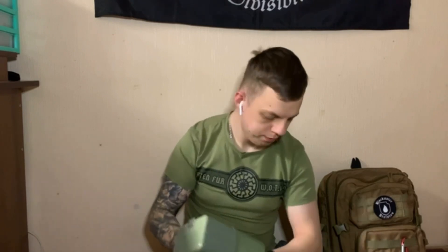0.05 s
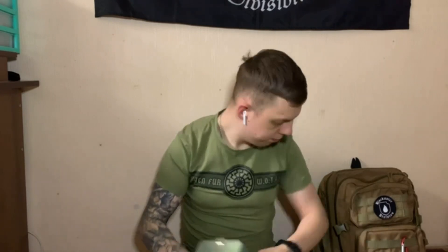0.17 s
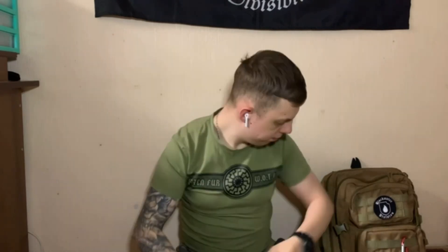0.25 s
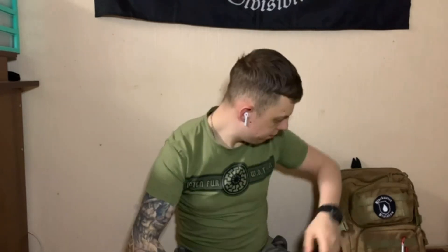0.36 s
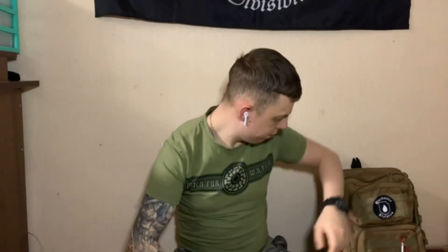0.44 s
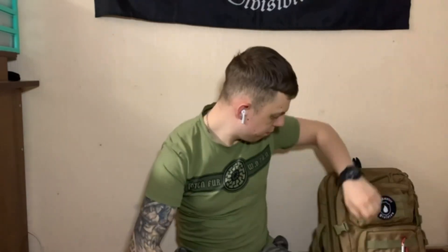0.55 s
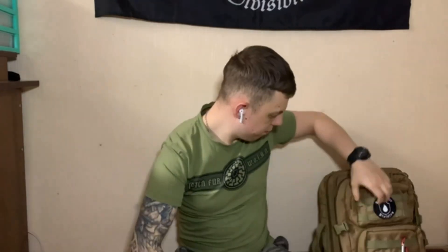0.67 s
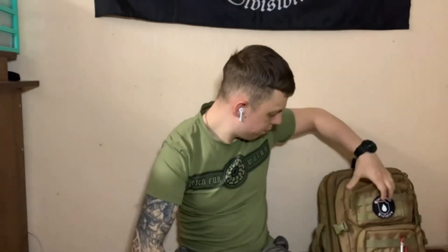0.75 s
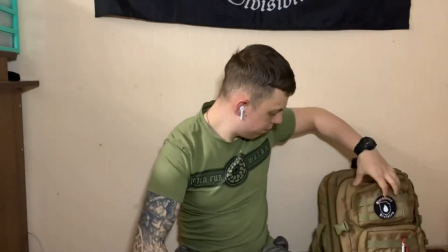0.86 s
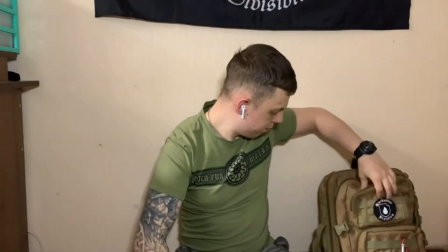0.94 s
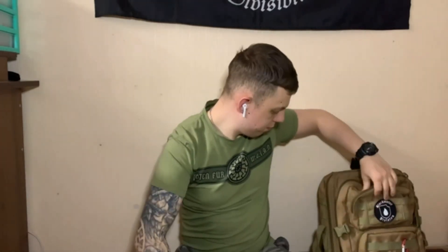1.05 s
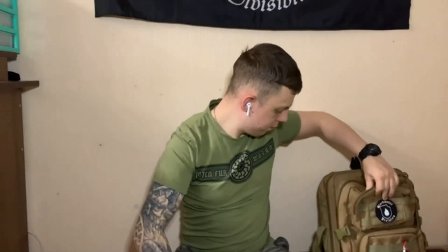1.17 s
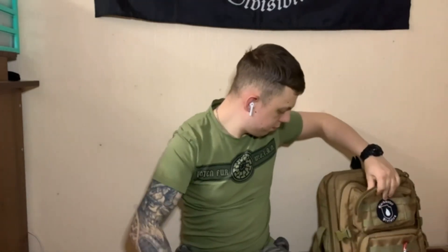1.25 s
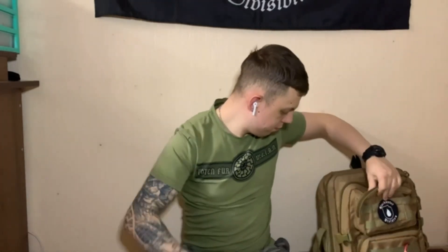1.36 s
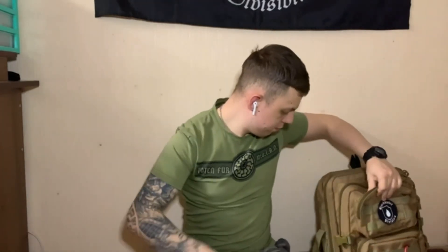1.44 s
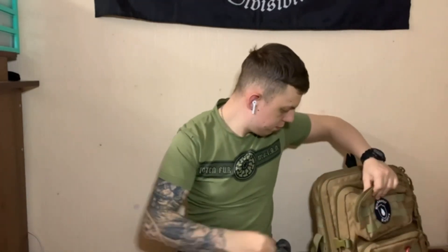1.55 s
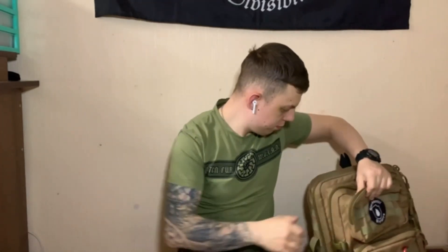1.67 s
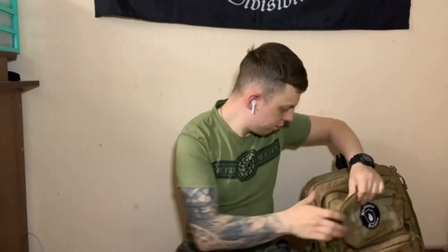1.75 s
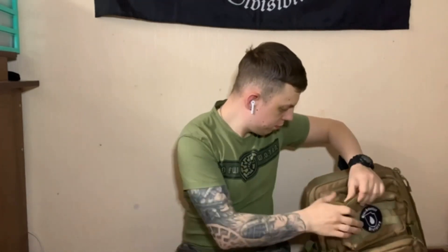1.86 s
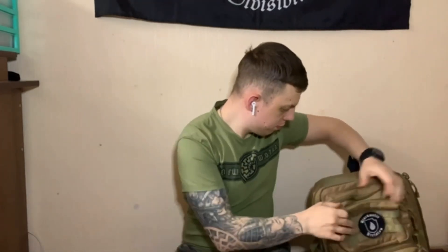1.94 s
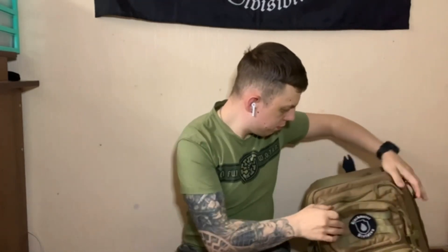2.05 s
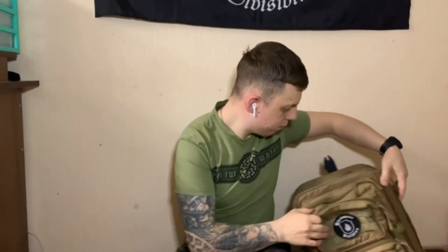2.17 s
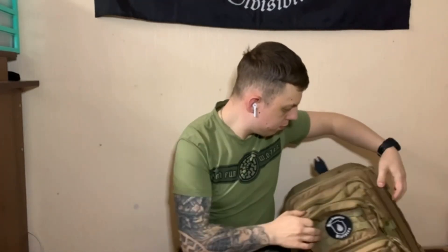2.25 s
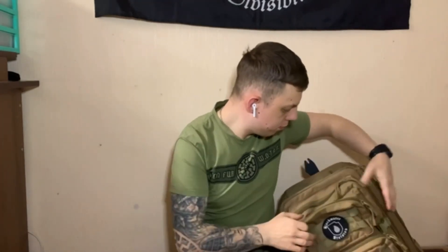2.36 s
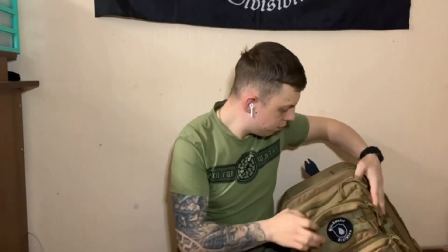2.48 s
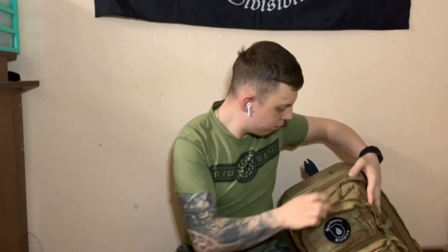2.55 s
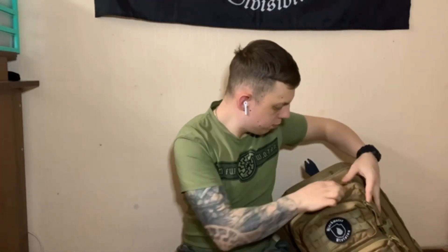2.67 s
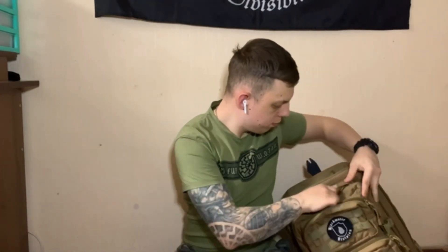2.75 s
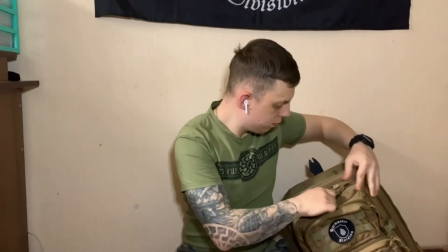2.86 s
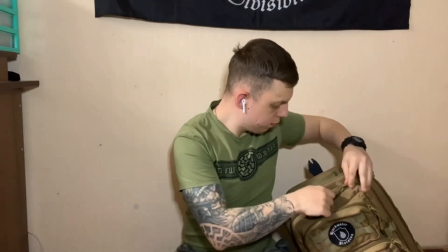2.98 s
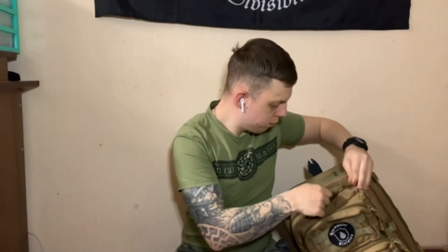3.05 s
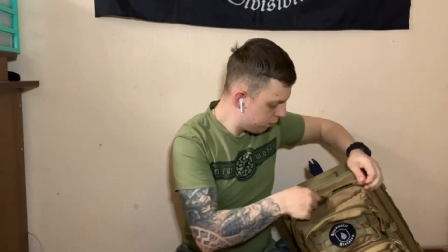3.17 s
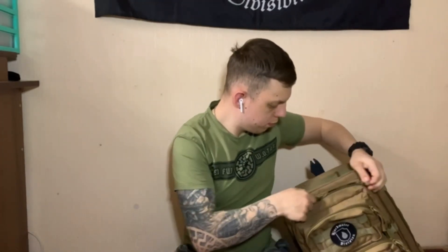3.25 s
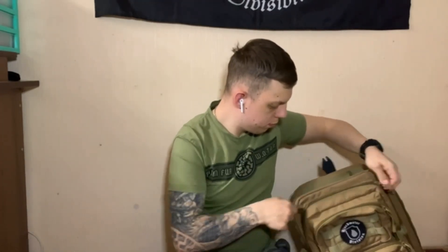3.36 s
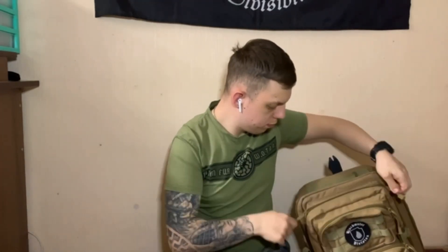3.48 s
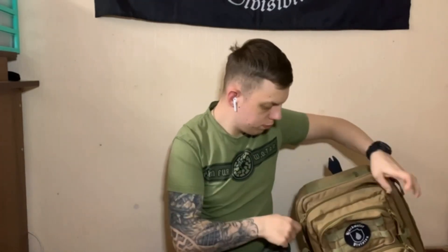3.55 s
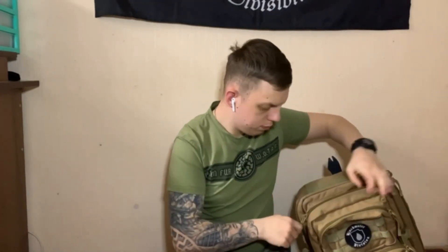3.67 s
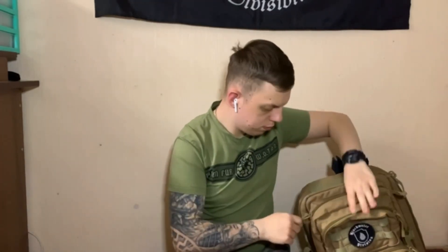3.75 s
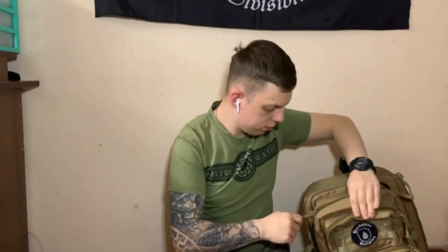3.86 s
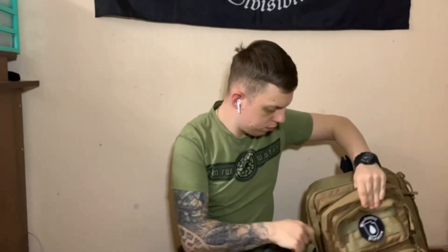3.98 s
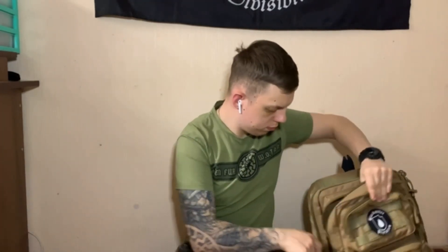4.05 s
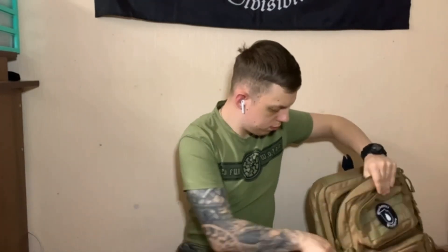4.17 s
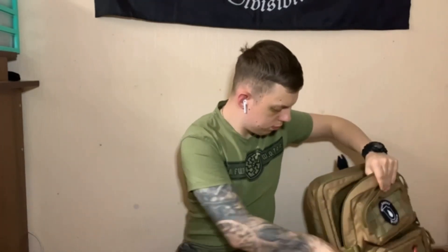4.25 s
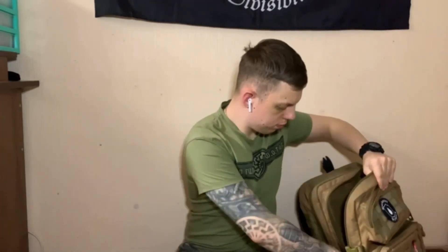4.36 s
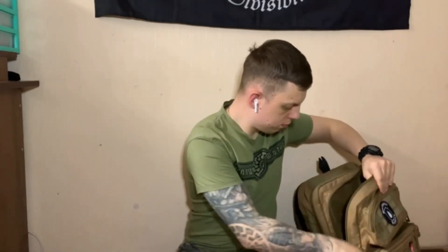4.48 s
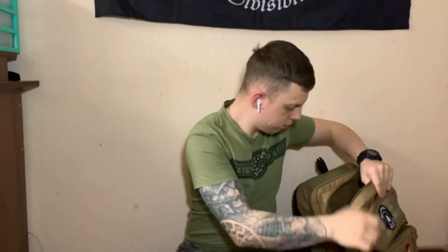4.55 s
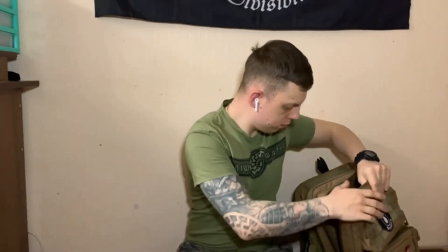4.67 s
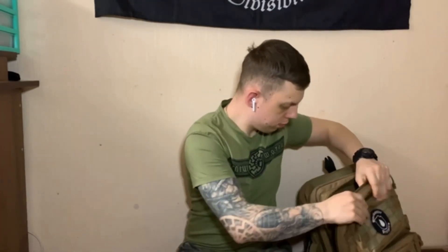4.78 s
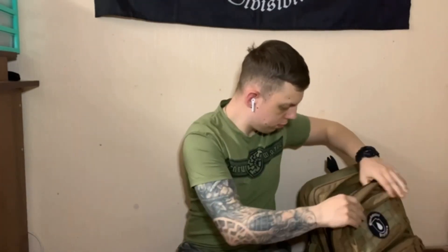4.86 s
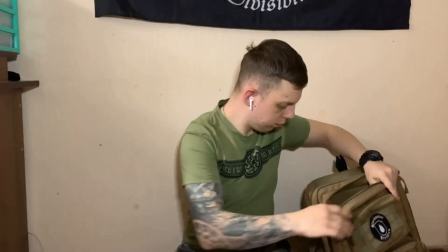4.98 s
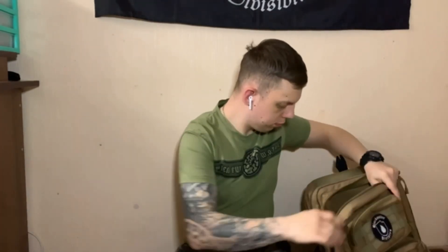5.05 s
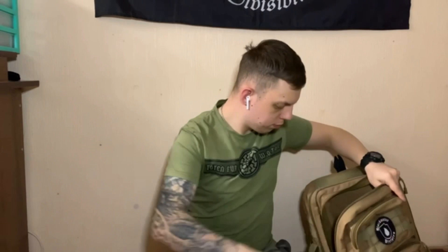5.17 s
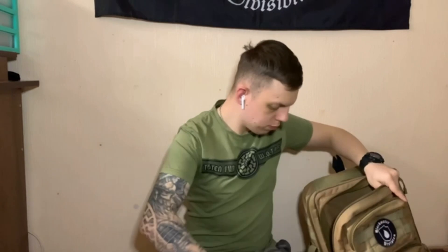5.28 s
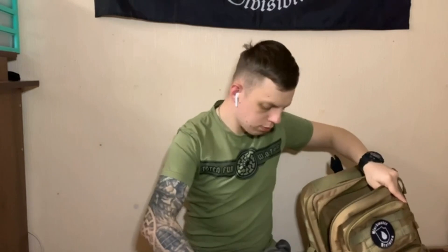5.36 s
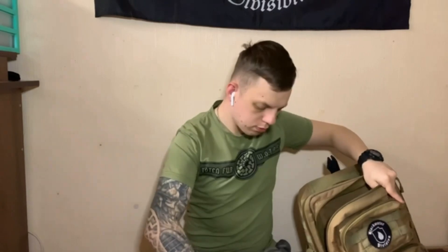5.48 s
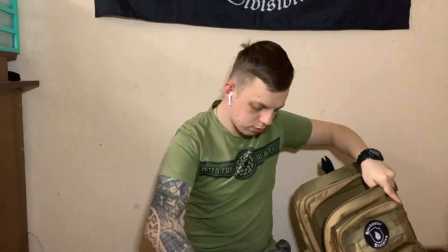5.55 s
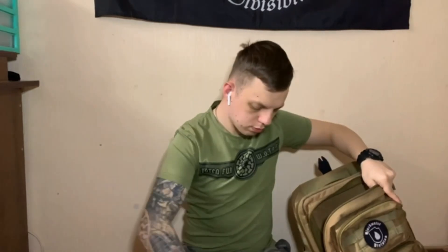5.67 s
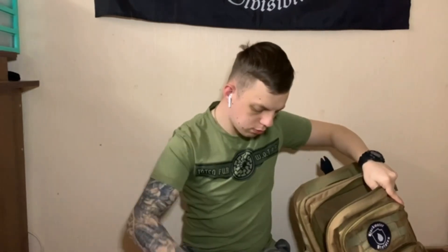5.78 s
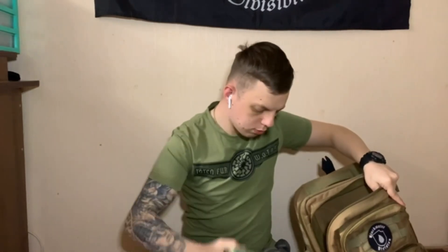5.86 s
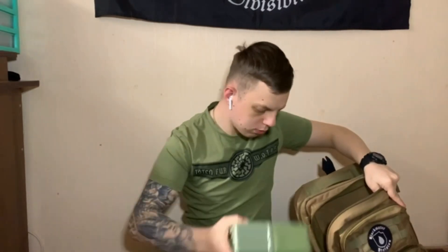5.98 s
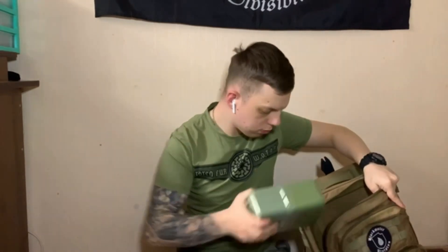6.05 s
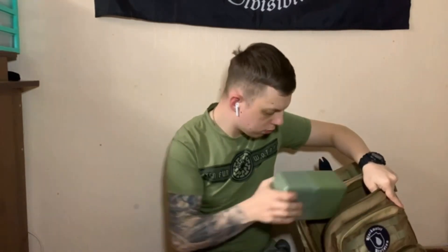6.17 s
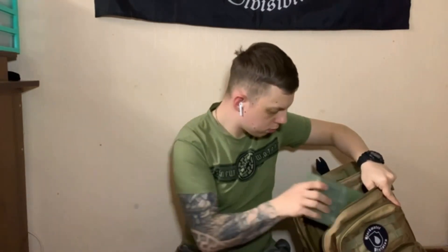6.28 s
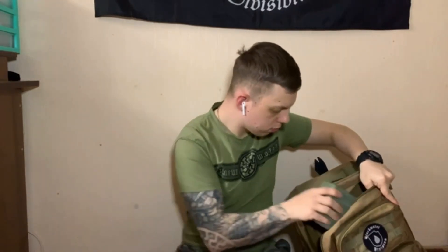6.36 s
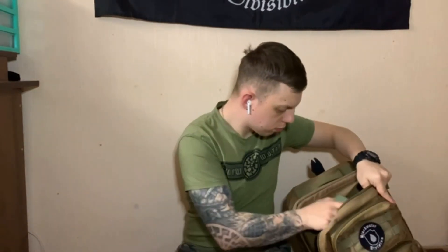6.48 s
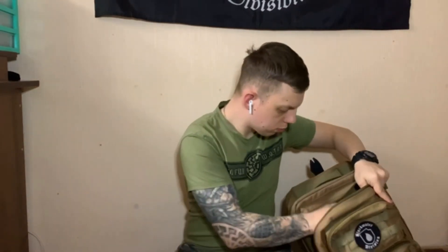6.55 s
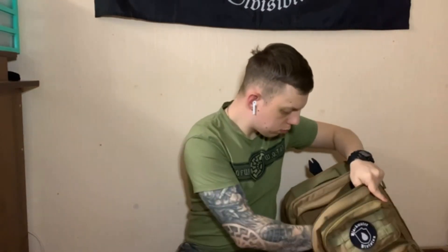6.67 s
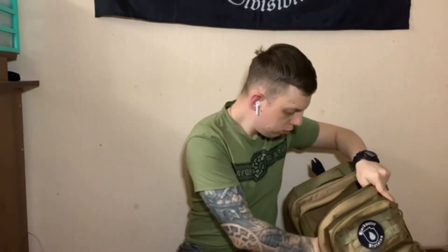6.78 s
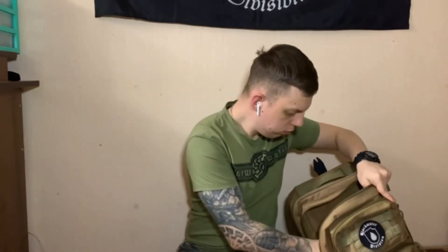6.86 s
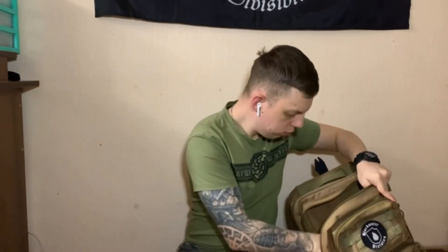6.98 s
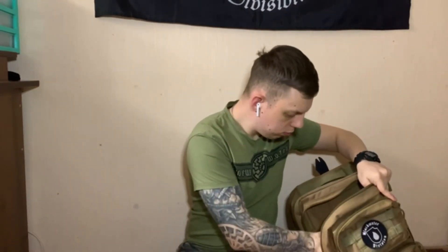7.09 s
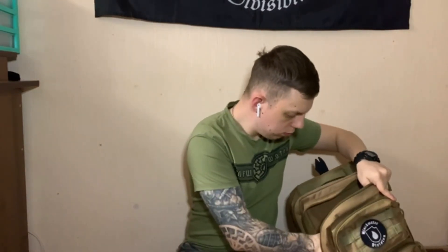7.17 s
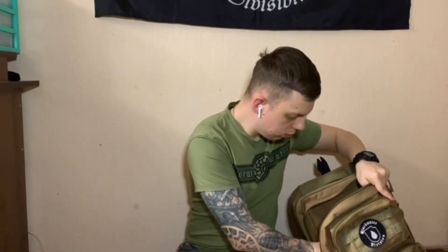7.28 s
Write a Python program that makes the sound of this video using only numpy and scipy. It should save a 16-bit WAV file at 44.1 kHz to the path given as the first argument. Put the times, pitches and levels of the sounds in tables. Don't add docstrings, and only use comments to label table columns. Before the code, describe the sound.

A stiff nylon backpack rustles and bumps, its zipper rips open in two quick strokes, and a hard box knocks loudly as it is packed.

```python
import sys
import numpy as np
from scipy import signal
from scipy.fft import rfft, irfft, next_fast_len
from scipy.io import wavfile
from scipy.ndimage import uniform_filter1d

SR = 44100
rng = np.random.default_rng(int(sys.argv[2]) if len(sys.argv) > 2 else 0)


def output_pcm(signal):
    pcm = np.clip(np.atleast_2d(signal).T, -1, 1) * 32767
    wavfile.write(sys.argv[1], SR, np.round(pcm).astype(np.int16))


def how_loud(loudness_db):
    steps = np.asarray(loudness_db, float) / 20
    return 10 ** steps


N = 323025
T = np.arange(N) / SR
SIZE = next_fast_len(N + 8192)

# frequency in Hz, density in dB per Hz.
FLOOR_SPECTRUM = [(12, -13.5), (20, 12), (85, 1), (505, -43), (4550, -49.5), (6540, -40.5), (7110, -58.5),
                  (8400, -39), (10200, -41), (11700, -38.5), (13900, -40.5), (15500, -41)]
FLOOR_DB = -60.5
# frequency in Hz, t60 in seconds.
ROOM_DECAY = [(100, 0.17), (500, 0.26), (2000, 0.16), (5000, 0.18), (10000, 0.047)]
# frequency in Hz, level in dB.
ROOM_LEVEL = [(60, -14.5), (250, -4.5), (700, 2.5), (2000, 2.5), (5000, 0), (6500, 2), (7250, 0), (8200, 5),
              (9200, -22), (10400, 10), (11500, -4), (15000, -16)]
# frequency in Hz, lead of the left port in radians.
PORT_PHASE = [(0, 0), (900, -.7), (2900, -.3), (4900, -.8), (5600, -2.6), (6800, -3.14), (7600, -3.2),
              (9000, -6.28), (10200, -6.4), (11000, -9.42), (12300, -9.42), (13200, -12.56), (15000, -12.6),
              (15400, -15.7)]

# start in seconds, length in seconds, pitch in Hz, width in Hz, level in dB.
CREAKS = [(.77, 0.083, 1590, 90, -75), (.835, 0.074, 994, 90, -73), (.62, 0.02, 1830, 150, -77),
          (.615, .015, 2900, 150, -83), (.89, 0.1, 1780, 160, -72), (.9, 0.064, 2070, 90, -66),
          (.965, 0.05, 4300, 900, -68), (1.04, 0.2, 2000, 180, -67), (1.1, 0.11, 1435, 160, -74),
          (2.69, 0.028, 2340, 110, -53), (2.73, 0.029, 2350, 110, -59), (2.745, 0.16, 2310, 120, -70)]
# start in seconds, level in dB, pitch in Hz, t60 in seconds.
BUMPS = [(0.094, -47.5, 98, 0.41), (0.626, -47, 116, 0.56), (0.954, -43.5, 177, 0.29),
         (1.402, -37, 180, 0.17), (1.839, -38, 219, 0.067), (2.077, -42.5, 170.5, 0.2),
         (2.142, -37, 285, 0.1), (2.662, -43.5, 112, 0.35), (2.95, -41.5, 164, 0.14),
         (3.169, -45, 208, 0.092), (3.719, -44, 171, 0.072), (3.762, -39.5, 167, 0.16),
         (3.99, -36, 288, 0.049), (4.131, -39.5, 157, 0.24), (4.565, -45, 238, 0.064),
         (4.677, -44, 97, 0.16), (5.259, -60, 104, 0.28), (6.115, -44.5, 89.5, 0.11),
         (6.553, -29.5, 180, 0.13), (6.816, -28, 164.4, 0.18), (7.036, -33.5, 198.3, 0.39),
         (7.259, -26.5, 172, 0.23)]

# start in seconds, blow in dB, low ring in Hz,
# high ring in dB, t60 in seconds.
KNOCKS = [(0.085, -35.5, 566, -2, 0.41), (0.945, -49, 710, -9, 0.06), (1.4, -40.5, 1110, 0.5, 0.015),
          (1.4355, -41, 880, -2, 0.011), (1.498, -54, 1500, -3, 0.014), (1.5181, -38, 720, -11.5, 0.012),
          (2.076, -32.5, 603, -4.5, 0.25), (2.4, -53, 623, -12.5, 0.095), (3.826, -48, 810, -6, 0.027),
          (3.848, -41.5, 730, -24, 0.024), (4.713, -52, 890, 5, 0.055), (4.926, -43, 510, -2, 0.076),
          (5.252, -40, 660, -30, 0.0061), (6.118, -39.5, 517, -37, 0.044), (6.273, -38, 576, 14, 0.08),
          (6.551, -29, 520, -14, 0.17), (6.705, -51, 700, -12, 0.045), (6.769, -38, 577, -7, 0.07),
          (7.23, -41, 565, -17, 0.13), (7.2555, -13, 570, 6.5, 0.031)]
# start in seconds, blow in dB,
# low ring in Hz, high ring in Hz, t60 in seconds.
CORNERS = [
    (1.522, -53, 1310, 1800, .02),
    (6.2735, -31, 2395, 3620, 0.011),
    (6.276, -39, 3030, 4500, 0.14),
    (6.2175, -41, 2110, 2900, 0.01),
    (6.556, -43.5, 2590, 3900, 0.12),
    (6.812, -18.5, 1453, 2320, 0.06),
    (6.812, -30, 3040, 4300, 0.039),
    (6.814, -22, 556, 2950, 0.08),
    (7.255, -22, 1430, 3480, 0.03),
    (7.262, -31, 1500, 2600, 0.13),
]
SHELL_HZ, CORNER_DB = 1950, -3.5

# frequency in Hz, density in dB per Hz.
WEIGHT_SPECTRUM = [(35, -38), (60, 4.5), (172, 4), (253, -1), (290, -3), (394, -7.5), (528, -14),
                   (900, -23.5), (1170, -48.5), (1980, -120)]
RUB_SPECTRUM = [(280, -3), (480, 4), (776, -2), (982, -4), (1090, -3), (2280, -6), (5000, -17.5),
                (6500, -44), (11000, -120)]
HISS_SPECTRUM = [(2000, -33.5), (3000, -8.5), (4500, -5.5), (6000, -4), (8500, -6), (11000, -13.5),
                 (13500, -12), (15000, -16), (16000, -65.5)]
# start in seconds, rub in dB, seconds to fall 20 dB,
# weight against rub in dB, hiss against rub in dB.
GRABS = [(0.0, -67, 0.11, -17, 1), (.092, -52, 0.09, -15, -8), (.626, -79, 0.5, 12, -4),
         (0.702, -67, .5, 7.5, -7), (0.941, -58, 0.14, 1.3, -9.5), (1.33, -67, 4.5, -21, -4.5),
         (1.408, -66.5, 1, 15, -8), (2.081, -50.5, .17, 5, -10), (2.665, -53, 0.3, 4.5, -7),
         (2.949, -57.5, 0.1, 1, 5.5), (3.11, -59, 1, 3.5, -9), (3.487, -55.5, 0.36, 3.5, -9.5),
         (3.871, -64.5, 0.4, 20, 0.5), (3.955, -55.5, 0.16, -12, 9), (4.355, -65, .5, 8, -14),
         (4.68, -61, 0.7, 9, -8), (4.866, -54, 0.01, -7, -3.5), (5.252, -64, 0.29, 9.5, -2.5),
         (6.116, -61, 7, 9, -8.5), (6.179, -55.5, 0.5, -28.5, 5), (6.557, -56, 0.73, 10.5, -1.5),
         (6.813, -43.5, 0.16, -19, -36), (7.04, -58, 0.44, 11.5, 1), (7.26, -41.5, 0.3, 2.5, -3.5)]
# peak in seconds, rub in dB,
# seconds to fall 20 dB, weight against rub in dB, hiss against rub in dB.
DRAGS = [(0.361, -63, 0.15, 2.5, -3.5), (1.13, -62, 0.25, 1.5, -6), (1.56, -63, -0.19, 19, -18),
         (1.901, -53, 0.24, 4.5, -3.5), (2.3, -63, 0.27, 14.5, -6), (2.415, -56, 0.1, 3, -2.5),
         (2.823, -67, 0.84, -4, -10), (3.059, -57.5, 0.06, 10, -17), (3.79, -62.5, 0.76, 7, -10.5),
         (4.557, -63, 0.22, 2, -1.5), (5.171, -79, 0.1, 9, 6), (4.782, -66, 0.06, 2, 11),
         (7.11, -54.5, -0.5, 2.5, 6.5), (4.33, -53.5, 0.15, -0.5, -8), (4.94, -56, 0.07, 4.5, -7.5),
         (5.406, -63.5, 0.16, 11, -13.5), (5.66, -75, 0.1, 16, -14), (.85, -67, 0.25, 0, -9),
         (2.53, -63, 0.06, 8, -10), (3.62, -62, 0.06, 0, -8), (3.69, -64, -0.5, 0, -8),
         (3.46, -58, 0.15, 12, -4), (6.3, -62, .1, 0, 10), (5.965, -85.5, .03, -5, 11),
         (6.81, -65.5, 0.2, -10, 8), (4.9, -59, 0.26, -9.5, -12), (6.297, -44, 0.04, -4.5, -0.5),
         (6.45, -58.5, 0.5, 11, -8), (6.799, -45, -0.05, 7.5, -6.5)]
GRAB_RISE_S, DRAG_RISE = 0.024, 0.77
CURL = 0.3
STEEPNESS, REST_DB = (1.276, 1, 1.62), (-89, -87, -87.5)

# frequency in Hz, density in dB per Hz.
TAPE_SPECTRUM = [(53, -27), (90, -4), (200, 3.5), (236, -3.5), (312, 1), (433, -3), (900, -6),
                 (1170, -10.5), (1980, -120)]
TEETH_SPECTRUM = [(350, -28), (600, 2), (698, -1), (1030, -7.5), (1440, -3), (1710, -2.5), (1970, -3),
                  (2520, -5.5), (4500, -10), (5850, -46), (9900, -120)]
SLIDER_SPECTRUM = [(3000, -58.5), (3800, 0), (5500, -4), (7000, -1), (8800, -3.5), (11000, -8.5),
                   (14000, -8), (15300, -10.5), (16000, -50)]
TAB_SPECTRUM = [(6500, -53), (7600, 0.5), (8800, -3.5), (10000, -5.5), (11200, -51)]
EDGE_SPECTRUM = [(3000, -37), (4200, -1.5), (6500, -2.5), (8900, 0.5), (10500, -8), (13500, -17),
                 (15300, -21.5), (16000, -50)]
TAB_DB = -8.5
# time in seconds, pull in dB, tooth rate in Hz,
# scrape share from 0 to 1.
STROKES = [
    [(3.115, -61, 140.5, 0.4), (3.135, -46.5, 165.8, 0.56), (3.164, -39, 206.1, 1),
     (3.206, -43.5, 205.4, 0.61), (3.226, -39, 296.2, 0.7), (3.276, -41, 335.7, 0.64),
     (3.328, -42.5, 329.6, 0.61), (3.44, -46, 150.1, 0.76), (3.52, -66, 99.6, 0.73)],
    [(3.955, -46.5, 260.4, 0.77), (3.995, -33, 272.2, 0.74), (4.036, -36, 262.6, 0.78),
     (4.09, -38.5, 135.3, 0.6), (4.13, -39.5, 150, 0.54), (4.17, -36, 290.4, 0.75), (4.21, -34, 239, 0.79),
     (4.295, -39.5, 281.2, 0.92), (4.39, -73, 293, 1)],
]
DRUM_DB = (-1.8, -5)
EDGE_DB, CLEAN_SHARE, DULL_DB = 3, 0.62, -35.5
# start in seconds, level in dB, slider edge
# in dB, tape in dB.
TICKS = [(0.704, -56, 8, -2), (2.0752, -29, -13, -1), (2.8015, -27, -1.5, -10), (2.944, -34.5, -13, -35),
         (3.016, -28, 4.5, -2), (3.052, -31, -9.5, 2), (3.0694, -32, 3, -1), (3.0834, -28, 0, -2),
         (3.0918, -30, 1.5, -1.5), (3.1005, -23.5, 4.5, 0), (3.109, -24.5, -4, 1.5), (3.116, -30, -10, 0),
         (3.1225, -33, -3, -3), (3.129, -31, -12, -1), (3.4405, -28, 4, -13), (3.4545, -29, 13, 2),
         (3.469, -31.5, -6, -0.5), (3.9545, -44, 4, -10), (3.9635, -36, -4, -17), (3.9675, -33, 2, -4),
         (3.972, -30, -4, -6), (6.1248, -52.5, -8, -1), (6.1762, -44, -10, -17), (6.5518, -38, -9, 2),
         (6.7299, -44, -15, 2), (3.8651, -28.5, 5, -9), (3.923, -28.5, 0.5, -35), (3.9587, -28.5, -2, -25),
         (4.672, -45, -7, -7), (4.7155, -44.5, -22, -2), (6.104, -46, 9, -7), (6.1689, -46, -10, -15),
         (6.2731, -20, 4, -24), (6.8111, -23, -15, -0.5), (7.2554, -14.5, 5, -6)]
# start in seconds, length in seconds,
# pitch in Hz, width in Hz, level in dB.
BINDS = [
    (3.09, 0.091, 543, 149, -48),
    (3.105, .05, 333, 149.5, -50.5),
    (3.165, 0.06, 200, 50, -50),
    (3.22, 0.033, 620, 70.2, -46.5),
    (3.31, 0.068, 1753, 448, -50),
    (3.972, 0.04, 1800, 498, -55),
    (4.012, 0.031, 2000, 500, -52),
    (4.235, 0.023, 2100, 403, -59),
    (4.17, 0.07, 450, 140, -44),
    (4.26, 0.04, 560, 120, -50),
]


def evened(x):
    return x / np.sqrt(np.mean(x ** 2) + 1e-20)


def read(points, hz):
    f, value = np.transpose(points)
    return np.interp(np.log(hz + 1), np.log(f + 1), value)


def coloured(x, points):
    hz = abs(np.fft.fftfreq(4096, 1 / SR))
    log_gain = np.log(how_loud(np.maximum(read(points, hz), -70)))
    response = np.exp(np.conj(signal.hilbert(log_gain)))
    taps = np.fft.ifft(response).real[:2048]
    return evened(signal.oaconvolve(x, taps)[:len(x)])


def resonate(x, hz, width):
    r = np.exp(-np.pi * width / SR)
    poles = [1, -2 * r * np.cos(2 * np.pi * hz / SR), r * r]
    return evened(signal.lfilter([1, 0, -1], poles, x))


def drift(hz):
    noise = uniform_filter1d(rng.standard_normal(N), 400)
    return evened(signal.lfilter(*signal.butter(1, hz, fs=SR), noise))


def fibres(per_s, spread_db, smooth):
    snaps = rng.standard_normal(N) * (rng.random(N) < per_s / SR)
    snaps *= how_loud(spread_db * np.minimum(rng.exponential(1, N), 4))
    return evened(snaps) + smooth * rng.standard_normal(N)


def patchy(x, depth_db):
    z = signal.stft(x, nperseg=512)[2]
    patches = rng.standard_normal(z.shape[::-1]).T
    patches = uniform_filter1d(patches, size=4, axis=0)
    patches = evened(uniform_filter1d(patches, size=5, axis=1))
    gain = how_loud(depth_db * patches - 0.11 * depth_db ** 2)
    return signal.istft(z * gain, nperseg=512)[1][:N]


def place(rows, sound):
    out, t = np.zeros(N + 9000), np.arange(9000) / SR
    for s, db, *rest in rows:
        x = sound(t, *rest)
        out[round(s * SR):][:len(t)] += how_loud(db) * x / abs(x).max()
    return out[:N]


def room_tone():
    return how_loud(FLOOR_DB) * coloured(rng.standard_normal(N), FLOOR_SPECTRUM) * how_loud(0.95 * drift(9.5))


def room(x):
    size = SR // 3
    taps = np.zeros((4, size))
    slots = np.arange(180, size - 20, 20)
    at = slots + rng.integers(0, 20, (4, (size - 181) // 20))
    np.put_along_axis(taps, at, rng.choice([-1., 1.], at.shape), 1)
    hz, t, z = signal.stft(taps, SR, nperseg=256)
    fall = how_loud(-60 * t / read(ROOM_DECAY, hz)[:, None])
    fall *= how_loud(read(ROOM_LEVEL, hz))[:, None] / np.linalg.norm(fall, axis=1, keepdims=True)
    tail = signal.istft(z * fall, SR, nperseg=256)[1] * np.sqrt(20 / 128)
    turn = 2 * np.pi * 3 * T
    sets = np.repeat([np.sin(turn), np.cos(turn)], 2, axis=0)
    wet = signal.fftconvolve(x * sets, tail, axes=1)[:, :N]
    return wet[:2] + wet[2:]


def squeaks(rows, drive):
    out = np.zeros(N)
    for s, length, hz, width, db in rows:
        rise, fall = (T - s) / 0.0044, (s + length - T) / (.5 * length)
        swell = np.clip(np.minimum(rise, fall), 0, 1)
        out += swell * how_loud(db) * resonate(resonate(drive, hz, width), hz, 2 * width)
    return out


def creaks():
    return squeaks(CREAKS, fibres(300, 0.6, 0.46) * how_loud(1.5 * drift(28)))


def bump(t, hz, t60):
    shake = (1 - np.exp(-t / 0.0031)) * how_loud(-60 * t / max(t60, .02))
    rough = resonate(resonate(rng.standard_normal(len(t)), hz, 200), hz, 230)
    return shake * (np.sin(2 * np.pi * hz * t) + 0.5 * rough)


def knock(t, low_hz, high_hz, high_db, t60):
    rattle = rng.standard_normal((2, len(t))) * how_loud(-60 * t / max(t60, .005))
    rattle *= 1 - np.exp(-t / 0.00043)
    push = t / 0.00072 * np.exp(-t / 0.00074)
    low = resonate(push * np.sin(2 * np.pi * low_hz * t) + 0.58 * rattle[0], low_hz, 380)
    high = resonate(push * np.sin(2 * np.pi * high_hz * t) + .25 * rattle[1], high_hz, 1200)
    return resonate(low, low_hz, 1020) + how_loud(high_db) * resonate(high, high_hz, 2000)


def knocks():
    shell = [(*row[:3], SHELL_HZ, *row[3:]) for row in KNOCKS]
    corners = [(*row[:4], CORNER_DB, row[4]) for row in CORNERS]
    return place(shell + corners, knock)


def handling(layer):
    power = how_loud(2 * REST_DB[layer]) * np.ones(N // 64 + 2)
    t = np.arange(len(power)) * 64 / SR
    moves = [(GRAB_RISE_S, *row) for row in GRABS] + [(DRAG_RISE * row[2], *row) for row in DRAGS]
    for rise, s, db, fall, weight_db, hiss_db in moves:
        away = np.maximum((s - t) / max(rise, 1e-3), (t - s) / max(fall, 1e-3))
        drop_db = 20 * STEEPNESS[layer] * away * (1 - CURL + CURL * away)
        power += how_loud(2 * (db + (0, weight_db, hiss_db)[layer] - drop_db))
    return np.interp(T, t, np.sqrt(power))


def cloth():
    flutter = drift(50)
    rub = coloured(fibres(900, 2.7, 1.97), RUB_SPECTRUM) * how_loud(1.93 * flutter)
    weight = coloured(fibres(150, 0.87, 1.72), WEIGHT_SPECTRUM) * how_loud(1.0 * flutter + 1.7 * drift(2.5))
    hiss = coloured(fibres(2500, 4.3, 1.5), HISS_SPECTRUM) * how_loud(0.42 * flutter)
    return handling(0) * rub + handling(1) * weight + handling(2) * hiss


def tick(t, edge_db, tape_db):
    scrape = .3 * np.exp(-t / .0004) + .025 * np.exp(-t / .012)
    click = (t == 0) + rng.standard_normal(len(t)) * scrape
    out = np.zeros(len(t))
    for db, body in ((0, TEETH_SPECTRUM), (edge_db, EDGE_SPECTRUM), (tape_db, TAPE_SPECTRUM)):
        x = coloured(click, body)
        out += how_loud(db) * x / abs(x).max()
    return out


def pull_gain(s, db):
    gain = (T >= s[0]) * (T <= s[-1]) * how_loud(np.interp(T, s, db))
    return uniform_filter1d(gain, size=200)


def zip_stroke(rows, drum_db):
    s, pull_db, hz, share = np.transpose(rows)
    edge_db = EDGE_DB + DULL_DB * np.maximum(share - CLEAN_SHARE, 0)
    share = np.clip(np.interp(T, s, share), 0, 1)
    rate = np.interp(T, s, hz) * (1 + .09 * share * drift(150))
    turns = np.cumsum((T > s[0]) * rate) / SR
    stutter = evened(uniform_filter1d(rng.standard_normal(N), size=90))
    turns = np.maximum.accumulate(turns + .11 * share * (turns > 0) * stutter)
    tooth = turns.astype(int)
    clicks = evened(-np.diff(tooth, prepend=0) * how_loud(2.5 * rng.standard_normal(N)))
    puffs = (.3 + np.exp(-(turns % 1) / .17)) * rng.standard_normal(N)
    puffs *= how_loud(2.6 * rng.standard_normal(tooth[-1] + 1))[tooth]
    puffs = evened(puffs)
    # scrape weight, spectrum, level in dB
    parts = [(.65, TAPE_SPECTRUM, drum_db), (1.204, TEETH_SPECTRUM, 0),
             (1.37, SLIDER_SPECTRUM, edge_db), (0.8, TAB_SPECTRUM, edge_db + TAB_DB)]
    out = np.zeros(N)
    for k, body, db in parts:
        drive = (1 - share * k) * clicks + share * k * puffs
        out += pull_gain(s, pull_db + db) * coloured(drive, body)
    return out


def binds(teeth):
    loudness = abs(uniform_filter1d(abs(teeth), size=800)) + 1e-4
    return squeaks(BINDS, teeth / loudness)


def scene():
    hits = place(BUMPS, bump) + knocks() + place(TICKS, tick)
    teeth = sum(map(zip_stroke, STROKES, DRUM_DB))
    rubbing = patchy(cloth(), 3.27) + patchy(teeth, 1.5) + binds(teeth)
    near = room_tone() + creaks() + hits + rubbing
    return how_loud(-1.5) * (near + room(near))


def top_cut(x):
    return signal.sosfilt(signal.butter(12, 16400, fs=SR, output="sos"), x)


def record(dry):
    hz = np.fft.rfftfreq(SIZE, 1 / SR)
    lead = np.interp(hz, *np.transpose(PORT_PHASE))
    response = np.exp(.5j * np.outer([1, -1], lead)) * how_loud([[-.25], [.25]])
    response /= 1 + (38 / (hz + 1)) ** 4
    mix = irfft(rfft(dry, SIZE) * response, SIZE)[:, :N]
    return top_cut(mix)


dry = scene()
out = record(dry)
output_pcm(out)
```